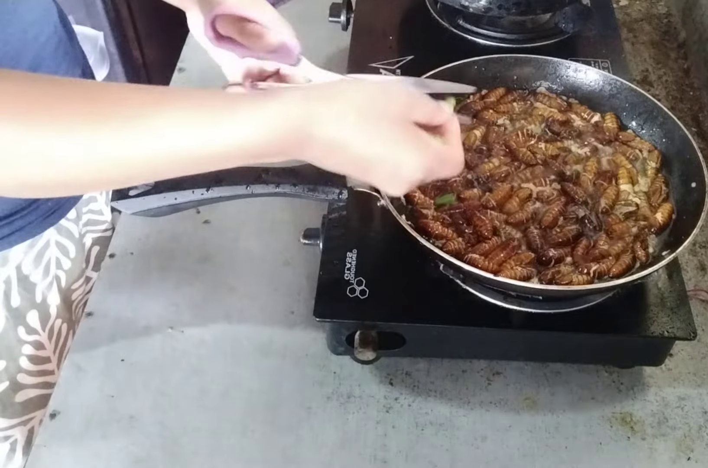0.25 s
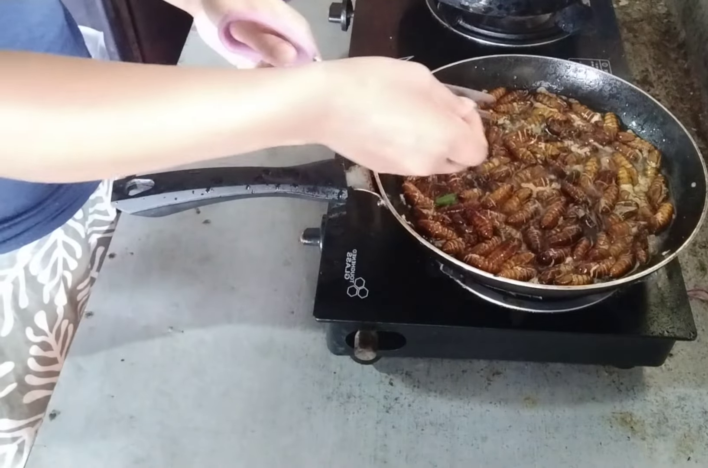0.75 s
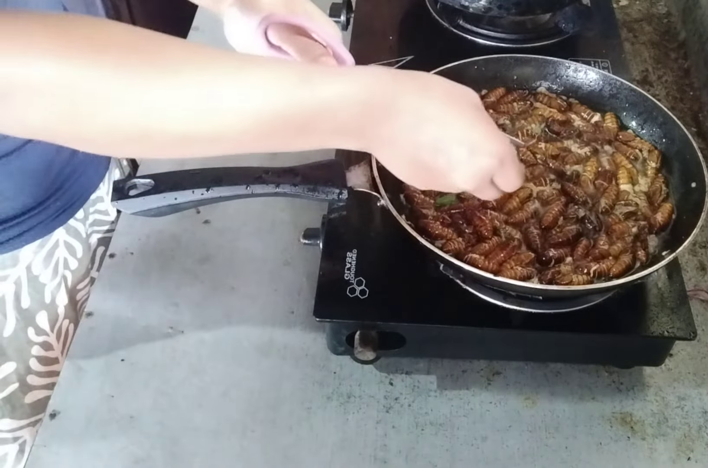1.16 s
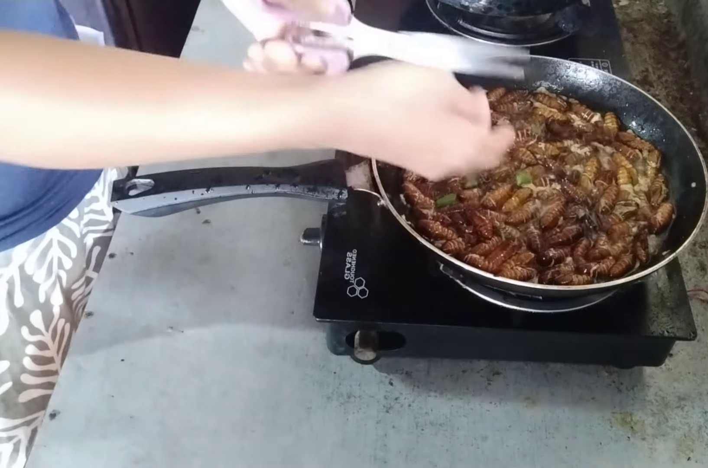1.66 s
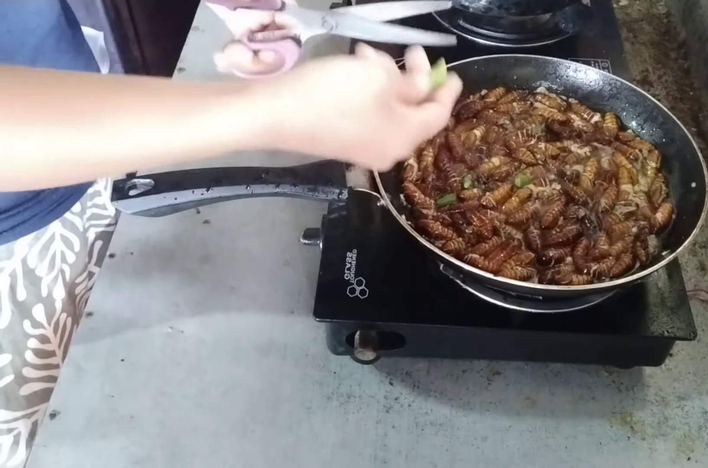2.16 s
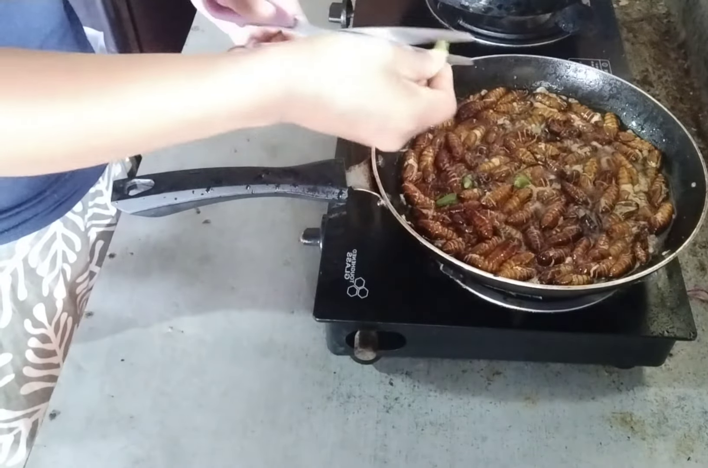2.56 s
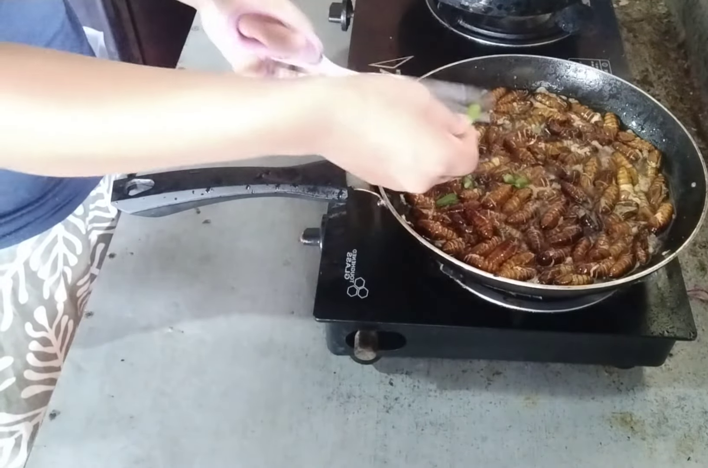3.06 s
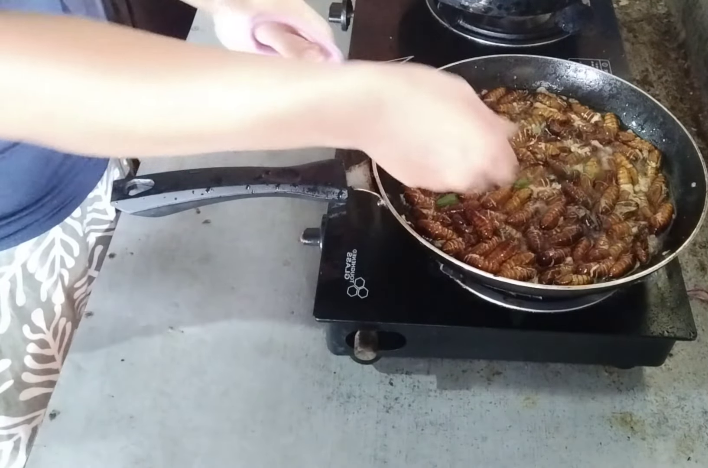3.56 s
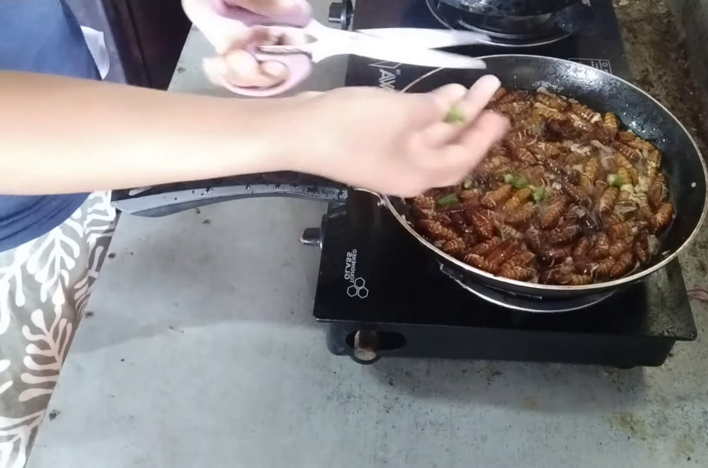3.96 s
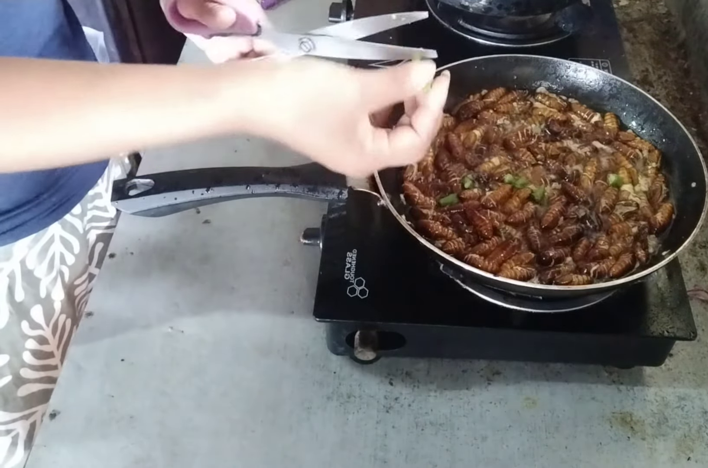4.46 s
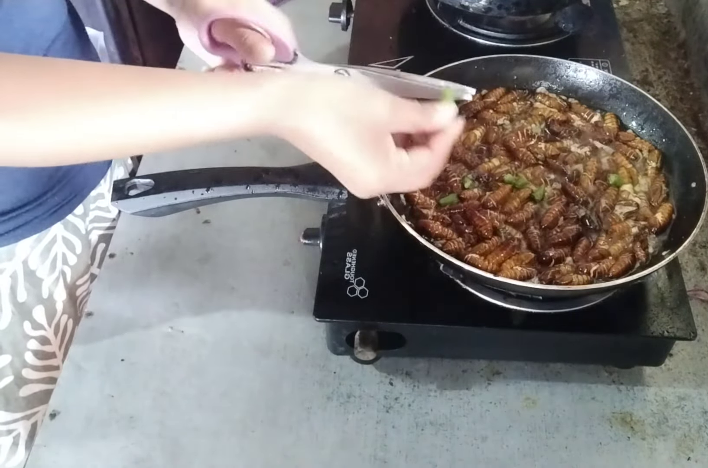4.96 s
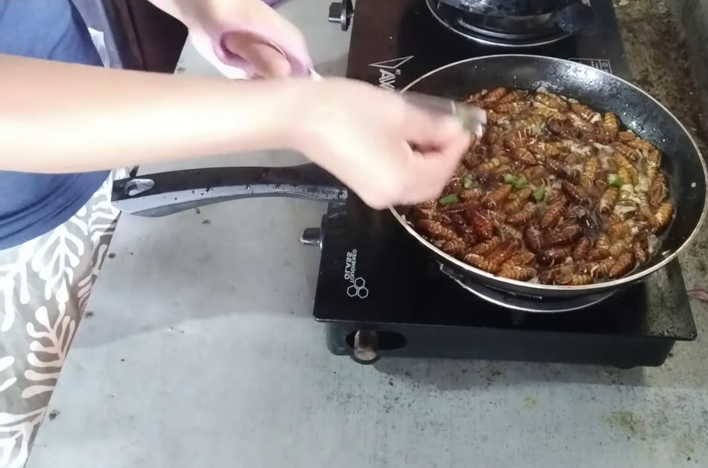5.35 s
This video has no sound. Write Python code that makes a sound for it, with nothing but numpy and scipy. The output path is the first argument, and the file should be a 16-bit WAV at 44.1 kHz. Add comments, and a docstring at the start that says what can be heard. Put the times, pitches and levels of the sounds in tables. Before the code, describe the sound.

A pan of food fizzes softly and spits now and then, while scissors snap shut close by in a small kitchen.

```python
"""Kitchen scissors snap shut five times near a two-port phone, while a pan sizzles gently on a gas stove.
Each snip is a rising shear, a chatter of steel and a faint rebound; the worktop and a small room answer it.
In the oil, bursting bubbles merge into a fizz, and pockets of steam spit now and then. Under them lie
a low rumble, three faint knocks of a hand and one short low note. The phone's automatic gain control
turns the level down after every snip."""
import sys
import numpy as np
from scipy import signal
from scipy.fft import rfft, irfft, next_fast_len
from scipy.io import wavfile
from scipy.ndimage import uniform_filter1d

SR = 44100
rng = np.random.default_rng(int(sys.argv[2]) if len(sys.argv) > 2 else 0)


def int16_out(signal):
    """Quantize to a 16-bit WAV file."""
    q = np.round(np.clip(np.atleast_2d(signal).T, -1, 1) * 32767)
    wavfile.write(sys.argv[1], SR, q.astype(np.int16))


N = 247046


def undb(db):
    """Amplitude ratio of a level in decibels."""
    return 10 ** (np.asarray(db) / 20)


def unit_rms(x):
    """Normalisation to unit mean power."""
    return x / np.sqrt(np.mean(x ** 2))


def at_hz(table, hz):
    """Linear interpolation on a logarithmic frequency axis."""
    freqs, values = np.transpose(table)
    return np.interp(np.log(np.maximum(hz, 1)), np.log(freqs), values)


def bandpass(x, lo_hz, hi_hz):
    """Butterworth band-pass filtering."""
    sos = signal.butter(2, [lo_hz, min(hi_hz, .49 * SR)], "band", fs=SR, output="sos")
    return signal.sosfilt(sos, x)


def drift(rate_hz):
    """Slow random modulation: held values, smoothed twice, at unit RMS."""
    hold = int(SR / rate_hz)
    steps = np.repeat(rng.standard_normal(N // hold + 1), hold)
    return unit_rms(uniform_filter1d(uniform_filter1d(steps, hold), hold)[:N])


def place(out, start_s, sound, pan_db, left_lag_ms=.1):
    """Direction as a level and time difference between the ports; positive pan favours the left."""
    pair = np.broadcast_to(sound, (2, sound.shape[-1]))
    for port, (lag_s, db) in enumerate([(left_lag_ms / 1000, pan_db / 2), (0, -pan_db / 2)]):
        i = min(int((start_s + lag_s) * SR), N)
        n = min(sound.shape[-1], N - i)
        out[port, i:i + n] += undb(db) * pair[port, :n]


def minimum_phase(gain_db):
    """Causal frequency response with these gains, from the folded cepstrum."""
    cepstrum = irfft(gain_db * np.log(10) / 20)
    half = len(cepstrum) // 2
    cepstrum[1:half] *= 2
    cepstrum[half + 1:] = 0
    return np.exp(rfft(cepstrum))


def resonance(peak_db, hz, width_hz):
    """A damped mode, softly driven, swells briefly and then decays exponentially."""
    t = np.arange(4000) / SR
    age = 2 * np.pi * width_hz * t
    return undb(peak_db) * np.sin(2 * np.pi * hz * t) * age * np.exp(1 - age)


# Likeness of steady noise at the two ports: (frequency [Hz], correlation [0-1])
PORT_CORRELATION = [(60, 0.71), (130, 1), (290, 0.69), (640, 0.26), (1400, .2), (3100, 0.079),
                    (6800, 0.011)]
# Balance of steady noise: (frequency [Hz], left minus right [dB])
PORT_BALANCE = [(60, 0), (110, 3.5), (200, -1), (380, 1.0), (700, -0.5), (1290, 0.5), (2380, 2),
                (4400, 1.5), (8120, 2), (15000, 0.5)]
def noise_field(pair, spectrum, flicker_db, rate_hz):
    """Partial coherence: two coloured noises mix as mid and side; each half octave flickers alone."""
    size = next_fast_len(N)
    hz = np.arange(size // 2 + 1) * SR / size
    alike = at_hz(PORT_CORRELATION, hz)
    mid, side = rfft(pair, size) * undb(at_hz(spectrum, hz)) * np.sqrt([1 + alike, 1 - alike])
    tilt = undb(at_hz(PORT_BALANCE, hz) / 2)
    ports = np.array([(mid + side) * tilt, (mid - side) / tilt])
    lo_hz, hi_hz = spectrum[0][0], spectrum[-1][0]
    octave = np.log2(np.maximum(hz, 1) / lo_hz)
    out = 0
    for centre in np.arange(0, np.log2(hi_hz / lo_hz) + 1, .5):
        share = np.clip(1 - 2 * abs(octave - centre), 0, 1)
        out = out + irfft(ports * share, size)[:, :N] * undb(flicker_db * drift(rate_hz))
    return unit_rms(out)


# Reverberation of the kitchen: (frequency [Hz], time to fall 60 dB [s])
DECAY_TIMES = [(900, 0.43), (2000, 0.37), (3000, 0.46), (8000, 0.24), (15000, 0.33)]
def reverberation(sound):
    """Dense reflections in a small hard room decay exponentially, each band at its own rate."""
    t = np.arange(int(.3 * SR)) / SR
    edges_hz = 700 * 2 ** np.arange(0, 5, .5)
    echoes = 0
    for lo, hi in zip(edges_hz, edges_hz[1:]):
        noise = bandpass(rng.standard_normal((2, len(t))), lo, hi)
        echoes = echoes + noise * undb(-60 * t / at_hz(DECAY_TIMES, np.sqrt(lo * hi)))
    # counter and stove reflect first, mostly into the left port
    early = 1 + undb([[11.], [5.]]) * np.exp(-t / .006)
    return signal.fftconvolve(np.atleast_2d(sound), echoes * early * (t > .002), axes=1)


# Spectrum of the room's drone: (frequency [Hz], relative spectral density [dB])
DRONE_SPECTRUM = [(12, -41), (20, -19), (43, -7.5), (70, -8), (91, -3.5), (119, -4), (149, -0.5),
                  (181, -4.5), (198, -18), (233, -9.5), (258, -19.5), (291, -9.5), (353, -8.5),
                  (392, -20.5), (700, -15.5), (910, -36), (1540, -120)]
# Envelope of the deepest rumble: (time [s], level [dB])
DEEP_LEVELS = [(0, -71), (.4, -61), (.8, -72), (1.3, -65), (1.8, -77), (2.9, -74), (4.9, -74), (5.3, -68),
               (5.6, -64)]
def rumble(drone_db=-59.5):
    """Low-frequency noise: the room drones, and a deeper band comes and goes."""
    drone = noise_field(rng.standard_normal((2, N)), DRONE_SPECTRUM, flicker_db=1.5, rate_hz=6)
    deep = unit_rms(bandpass(rng.standard_normal(N), 25, 54))
    deep_db = np.interp(np.arange(N) / SR, *np.transpose(DEEP_LEVELS))
    return drone * undb(drone_db) + deep * undb(deep_db)


# A short low note: (time [s], peak level [dB], frequency [Hz], width [Hz])
LOW_NOTES = [(2.654, -52.5, 408, 13)]
def low_note():
    """A single narrow resonance sounds briefly."""
    out = np.zeros((2, N))
    for start_s, db, hz, width_hz in LOW_NOTES:
        place(out, start_s, resonance(db, hz, width_hz), pan_db=1.2)
    return out


# Modes of the worktop: (frequency [Hz], relative level [dB], width [Hz])
WORKTOP_MODES = [(142, 0, 33), (750, 9.5, 250), (1150, 11.5, 200), (1700, 9, 350)]
def worktop(db, tilt_db):
    """Modal superposition: a blow rings every mode, and a softer one loses more per octave."""
    lowest_hz = WORKTOP_MODES[0][0]
    return sum(resonance(db + mode_db + tilt_db * np.log2(hz / lowest_hz), hz, width_hz)
               for hz, mode_db, width_hz in WORKTOP_MODES)


# Knocks on the worktop: (time [s], level of the lowest mode [dB], tilt [dB/octave])
HAND_KNOCKS = [(.902, -58.5, 1), (2.5213, -48, 0), (2.603, -47, -10)]
def knocks():
    """Impact excitation: a hand sets the worktop ringing."""
    out = np.zeros((2, N))
    for start_s, db, tilt_db in HAND_KNOCKS:
        place(out, start_s, worktop(db, tilt_db), pan_db=1.2)
    return out


# Sizzle as heard through the phone, with a microphone peak near 8.3 kHz and the hiss cut off at 15.5 kHz:
# (frequency [Hz], relative spectral density [dB])
HEARD_SIZZLE = [(290, -24), (500, -8.5), (561, -9.5), (758, -0.5), (826, -7), (900, -4.5), (1070, 1.5),
                (1400, -2), (1960, -3.5), (2350, -0.5), (2880, -0.2), (3400, 0), (5500, -2.5), (7000, -3.5),
                (8100, -0.1), (8800, -0.6), (9870, -5), (12500, -5.5), (15420, -7.5), (15560, -51)]
def fizz(level_db=-44.5, swell_db=.9, bubbles_per_s=700, puff_ms=1, blur_db=5):
    """Shot noise: bubbles burst at random as short puffs, over a steady blur of smaller ones."""
    popping = rng.random(N) < bubbles_per_s / SR
    size_db = np.minimum(rng.exponential(size=N), 12.5)
    fade = np.exp(-1000 / (puff_ms * SR))
    puffs = unit_rms(signal.lfilter([1], [1, -fade], popping * undb(size_db)))
    envelope = np.sqrt(puffs ** 2 + undb(blur_db) ** 2)  # incoherent sources add in power
    hiss = noise_field(envelope * rng.standard_normal((2, N)), HEARD_SIZZLE, flicker_db=.6, rate_hz=14)
    return hiss * undb(level_db + swell_db * drift(2.97))


# Loudest spits of oil:
# (time [s], peak level [dB], centre [Hz], width [octaves], decay time [ms], left minus right [dB])
LOUD_SPITS = [(0.047, -34.5, 3000, 0.71, 4, -2), (0.057, -29.5, 8400, 1, 4, -2),
              (0.206, -37, 8600, .3, 4, 1.5), (0.4853, -31, 9500, 1, 0.76, 1.5),
              (0.5496, -36.5, 8740, 0.18, 3.6, -1), (0.898, -37, 2720, 0.51, 5.4, 0),
              (1.1333, -29.5, 11000, 0.76, 1, 3), (1.2471, -36.5, 8550, .2, 4, 3),
              (1.29, -39, 2000, 1.6, 6, -1), (2.0544, -34, 8000, .4, 3.2, 2), (2.3314, -41, 3430, .4, 3, 3),
              (4.3154, -36, 3670, 0.43, 1, 0), (4.6159, -30.5, 8140, .8, 1.5, 0),
              (5.0674, -35, 8420, 0.37, 2.8, -1)]
def spits(small_count=150, lo_hz=5000, hi_hz=12900, echo_db=-35):
    """Sudden pressure release: each pocket of steam bursts as a decaying band of noise."""
    out, t = np.zeros((2, N)), np.arange(1500) / SR
    # small spits come at random, in the same columns as the loud ones
    small = [(when * N / SR, -38.5 - np.log(1 - size), lo_hz * (hi_hz / lo_hz) ** pitch, .9, .8, 8 * side)
             for when, size, pitch, side in rng.random((small_count, 4))]
    for start_s, db, hz, octaves, decay_ms, pan_db in [*LOUD_SPITS, *small]:
        edge_ratio = 2 ** (octaves / 2)
        crackle = rng.standard_normal((2, len(t))) * np.exp(-1000 * t / decay_ms)
        burst = bandpass(crackle, hz / edge_ratio, hz * edge_ratio)
        place(out, start_s, undb(db) * burst / abs(burst).max(), pan_db)
    return out + undb(echo_db) * reverberation(out)[:, :N]


def flat_burst(envelope):
    """Broadband excitation: a noise burst of unit energy at each port, with a nearly flat spectrum."""
    burst = envelope * rng.standard_normal((2, len(envelope)))
    for _ in range(4):  # whiten, then confine to the envelope again
        spectrum = rfft(burst)
        white = irfft(spectrum / abs(spectrum)) * np.sqrt(np.sum(envelope ** 2))
        burst = envelope * np.tanh(white / (envelope + 1e-9))
    return burst / np.sqrt(np.sum(burst ** 2, axis=1, keepdims=True))


# Likeness of the chatter at the two ports: (frequency [Hz], shared power [0-1])
CHATTER_COHERENCE = [(1500, .75), (4000, 0.7), (8000, 0.35)]
def chatter(t, hz, contact_s=.0022):
    """Contact noise: the spectrum of steel rattling on steel, partly coherent between the ports."""
    arch = np.clip(np.sin(np.pi * t / contact_s), 0, 1) ** .58
    envelope = arch * (t > 0) * (t < contact_s)
    alike = at_hz(CHATTER_COHERENCE, hz)
    shared, separate = rfft(flat_burst(envelope)[0]), rfft(flat_burst(envelope))
    return np.sqrt(alike) * shared + np.sqrt(1 - alike) * separate


def shear(t, drive_db=-34.5, rise_s=.0031):
    """Sliding friction: the spectrum of a scrape that grows exponentially until the blades shut."""
    envelope = undb(drive_db) * np.exp(np.minimum(t, 0) / rise_s) * (t < 0)
    return rfft(envelope * rng.standard_normal((2, len(t))))


# Tone of a snip as heard through the phone, brightest near 8.5 kHz and cut steeply above 15.5 kHz:
# (frequency [Hz], relative spectral density [dB])
HEARD_SNIP = [(150, -26.5), (500, -27), (900, -22.5), (1300, -13), (1820, -13), (2230, -25), (2750, -11.5),
              (4200, -12), (4900, -11), (5700, -10), (6900, -6.5), (7700, -1.5), (8700, 1), (9200, -1.5),
              (10200, -7), (11400, -5), (13300, -9), (14200, -11.5), (15200, -15), (15450, -12),
              (15600, -35)]
# Blade closures: (time [s], level [dB], left minus right [dB], strongest ring [Hz], ring lift [dB],
# knock below 2 kHz [dB], crack at 2-6 kHz [dB], rebound relative to the blow [dB])
CLOSURES = [(1.3470, -9.5, -1.5, 7900, 9.5, 2.5, 2, -30), (2.9449, -13.5, -0.5, 8250, 2.5, -2, -1.5, -18),
            (3.5409, -14, -0.5, 8100, 6.5, 0, 2, -23), (4.9216, -12.5, 0, 8240, 5.5, 0, 2.5, -26),
            (5.4845, -9.5, 3, 7300, 12, -1, 4, -30)]
def scissors(ring_width_hz=400, echo_db=-33, rebound_s=.0095, thud_db=-36.5):
    """Source and filter: shear and chatter take a snip's tone; blades rebound, room and worktop answer."""
    out = np.zeros((2, N))
    t = np.arange(-900, 1148) / SR  # the blades shut at t = 0
    hz = np.arange(len(t) // 2 + 1) * SR / len(t)
    for shut_s, db, pan_db, ring_hz, lift_db, knock_db, crack_db, rebound_db in CLOSURES:
        ring_db = lift_db / (1 + ((hz - ring_hz) / ring_width_hz) ** 2)
        shelf_db = at_hz([(1900, knock_db), (2300, crack_db), (5500, crack_db), (6500, 0)], hz)
        tone = minimum_phase(at_hz(HEARD_SNIP, hz) + shelf_db + ring_db)
        tone *= undb(db) * np.sqrt(.002 * SR / np.mean(abs(tone) ** 2))  # energy of 2 ms at this level
        snip = irfft((shear(t) + chatter(t, hz)) * tone)
        place(out, shut_s + t[0], snip, pan_db)
        blow = irfft(tone * minimum_phase(-.5 * ring_db))  # the echoes keep half the ring's lift
        place(out, shut_s, reverberation(blow) * undb(echo_db), pan_db=0)
        rebound = resonance(db + rebound_db, hz=4640, width_hz=70)
        place(out, shut_s + rebound_s, rebound, pan_db, left_lag_ms=0)
        place(out, shut_s, worktop(db + knock_db + thud_db, tilt_db=-12), pan_db=1.2)
    return out


def scene():
    """Superposition: the pressures of all sources add at each port."""
    return fizz() + scissors() + spits() + knocks() + low_note() + rumble()


def record(dry, memory_s=.77, slope=.13, unity_gain_db=-40.5, ceiling=.95, cutoff_hz=16620):
    """Automatic gain control: gain falls as average power rises; peaks round off and the top is cut."""
    pole = np.exp(-1 / (memory_s * SR))
    rest_power = undb(unity_gain_db) ** 2
    power = signal.lfilter([1 - pole], [1, -pole], np.mean(dry ** 2, axis=0), zi=[rest_power])[0]
    lagging_power = uniform_filter1d(power, size=2001, origin=1000)
    levelled = dry * (lagging_power / rest_power) ** -slope
    rounded = levelled / (1 + (levelled / ceiling) ** 4) ** .25
    return signal.sosfilt(signal.cheby2(22, 75, cutoff_hz, fs=SR, output="sos"), rounded)


dry = scene()
out = record(dry)
int16_out(out)
```